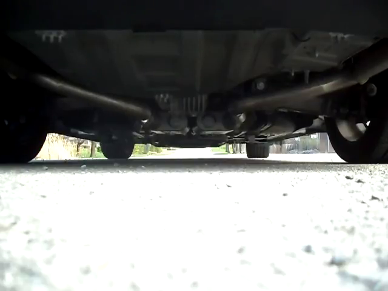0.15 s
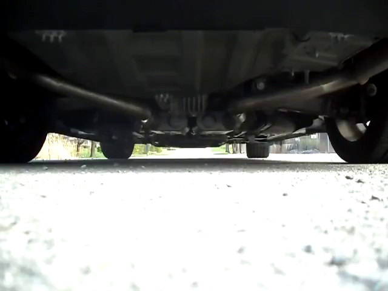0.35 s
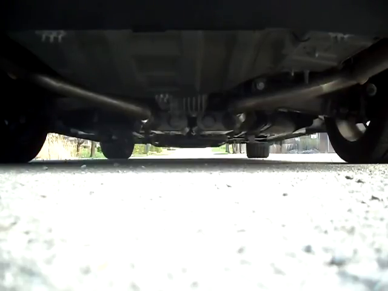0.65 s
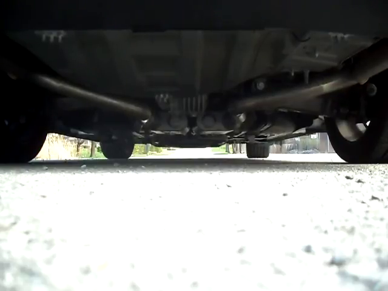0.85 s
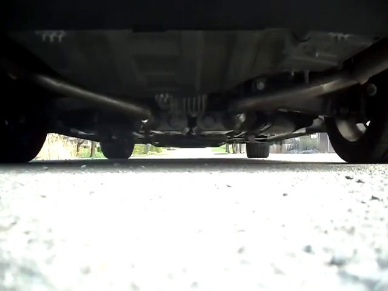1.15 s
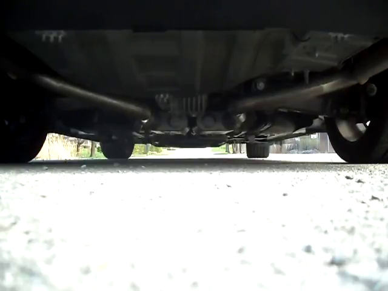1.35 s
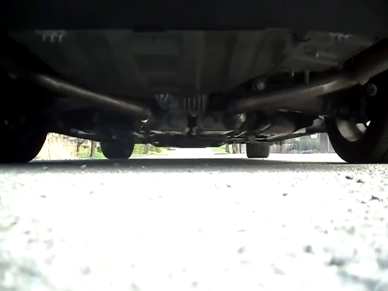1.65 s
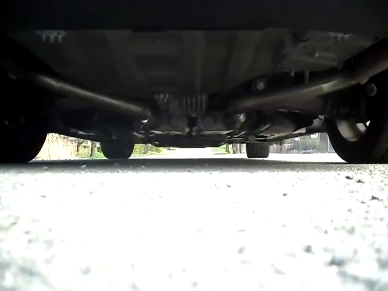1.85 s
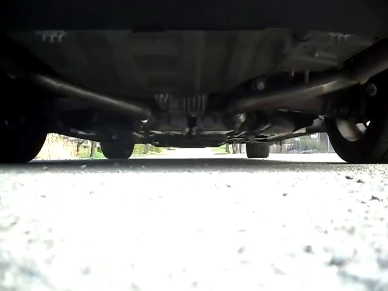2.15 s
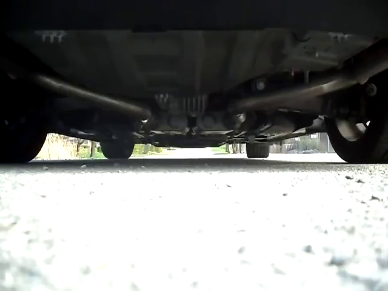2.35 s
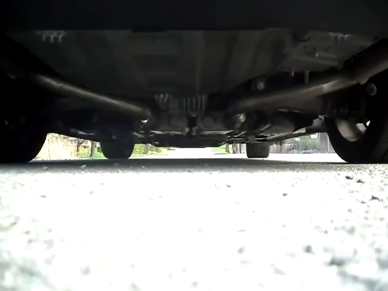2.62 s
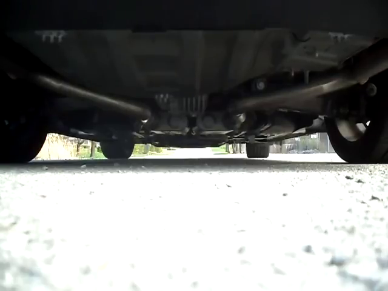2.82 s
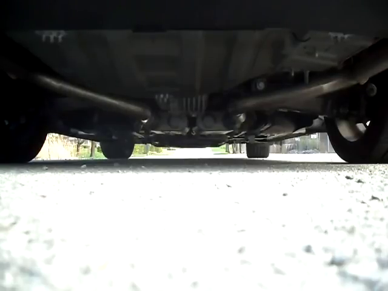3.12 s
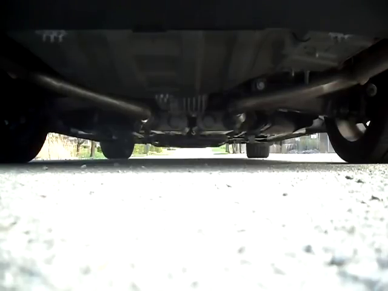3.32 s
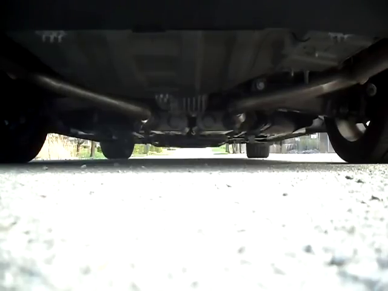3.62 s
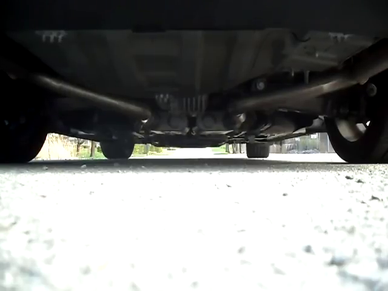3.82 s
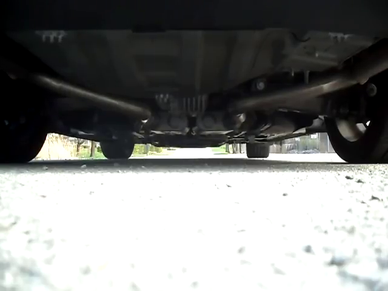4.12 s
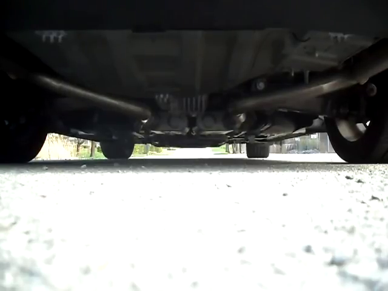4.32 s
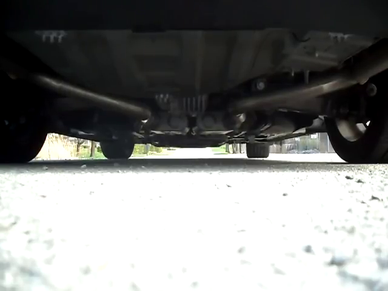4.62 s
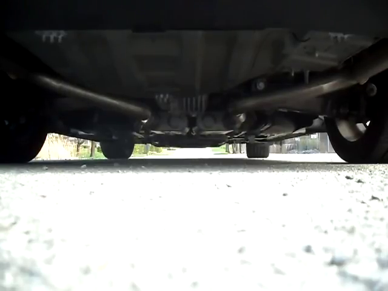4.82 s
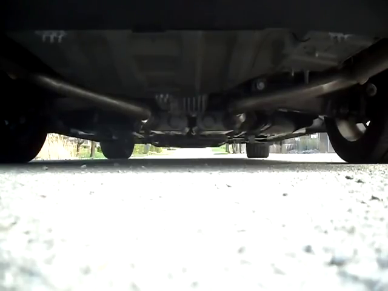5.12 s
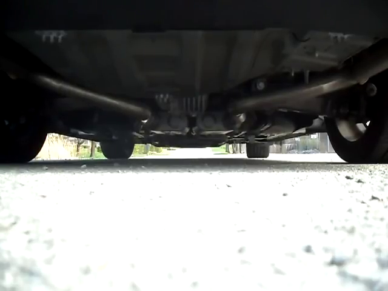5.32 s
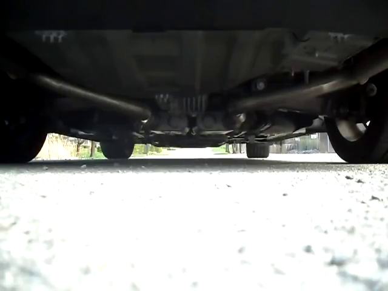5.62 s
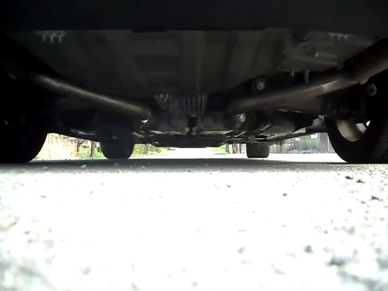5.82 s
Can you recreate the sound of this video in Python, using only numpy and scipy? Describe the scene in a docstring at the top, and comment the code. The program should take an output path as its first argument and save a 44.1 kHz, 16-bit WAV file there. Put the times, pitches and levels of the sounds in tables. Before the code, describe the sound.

A V8 car engine, already running near idle, burbles unevenly through its tail pipes. The throttle is blipped three times, the second highest. Each rev sweeps up with rushing gas and a metallic whir, overloading the microphone into crackle. A low chug follows the second rev. After the third, the engine sinks to a loping idle with dull thuds and faint ticks of hot pipes. The microphone sits close, on the ground beneath the exhaust.

```python
"""A V8 heard from the ground under its tail pipes. It starts near idle, the uneven pulses of its two
cylinder banks burbling in the pipes. The throttle is blipped three times: each time the note sweeps up
through the pipe resonances, gas rushes, the engine whirs ahead and steep pressure crests overload the
microphone and crackle. Unburnt fuel chugs after the second blip. After the third the engine sinks back
to a loping idle, with dull thuds and the ticking of hot pipes."""
import sys
import numpy as np
from scipy import signal
from scipy.fft import rfft, irfft, next_fast_len
from scipy.io import wavfile

SR = 44100
rng = np.random.default_rng(int(sys.argv[2]) if len(sys.argv) > 2 else 0)


def master_out(mix):
    """Clip the mix to full scale and print it as 16-bit PCM to the path in sys.argv[1]."""
    frames = np.transpose(np.atleast_2d(mix))
    ceiling = np.clip(frames, -1, 1)
    pcm = np.round(ceiling * 32767).astype(np.int16)
    wavfile.write(sys.argv[1], SR, pcm)


N = 262836
TIME = np.arange(N) / SR
CYLINDERS = 8
HEAT_PER_OCTAVE, HEAT_LOAD = .059, .092   # hot gas lifts resonances by a share: with revs, at full load


def from_db(db):
    """Decibels to gain."""
    return 10 ** (np.asarray(db) / 20)

def rms_one(x):
    """Scale to unit rms."""
    return x / np.sqrt(np.mean(x ** 2) + 1e-20)

def curves(rows, at):
    """Look up `at` in a table's first column: one curve for each other column."""
    points, *columns = np.transpose(rows)
    return [np.interp(at, points, column) for column in columns]

def butter(x, hz, kind, order=2):
    """Causal Butterworth filter."""
    return signal.sosfilt(signal.butter(order, hz, kind, fs=SR, output="sos"), x)

def filtered(x, response):
    """Pass x through a frequency response given as a function of Hz."""
    size = next_fast_len(N + SR // 2)
    hz = np.maximum(np.arange(size // 2 + 1) * SR / size, 1)
    return irfft(rfft(x, size) * response(hz), size)[:N]

def coloured_noise(colour):
    """Noise of unit rms shaped by an EQ curve."""
    at, db = np.transpose(colour)
    white = rng.standard_normal(N)
    return rms_one(filtered(white, lambda hz: from_db(np.interp(np.log(hz), np.log(at), db))))

def wall_ring(hz, width_hz, db):
    """Noise rings one metallic resonance of the pipe wall."""
    resonance = signal.iirpeak(hz, hz / width_hz, fs=SR)
    return from_db(db) * rms_one(signal.lfilter(*resonance, rng.standard_normal(N)))

def pops(rows, band_hz, trim_db=0):
    """Single spikes heard through a band, from rows of (start_s, level_db)."""
    spikes = np.zeros(N)
    for start_s, db in rows:
        spikes[int(start_s * SR)] = from_db(db + trim_db)
    height = np.abs(butter(signal.unit_impulse(64), band_hz, "band", order=1)).max()
    return butter(spikes + 1e-18, band_hz, "band", order=1) / height


# Ticks of the hot pipes: start_s, relative_db
PIPE_TICKS = [(0.981, -40), (1.1857, -40), (2.8034, -40), (4.4047, -36), (4.468, -33), (4.708, -35),
              (4.916, -31), (5.2646, -37)]
def pipe_ticks(decay_s=.0014, trim_db=-9):
    """Short dry snaps of expanding metal."""
    envelope = np.zeros(N)
    for start_s, db in PIPE_TICKS:
        envelope += from_db(db + trim_db) * np.exp(-np.abs(TIME - start_s) / decay_s) * (TIME >= start_s)
    return butter(envelope * rng.standard_normal(N), [3000, 9500], "band")

# Airy noise beds, throttle shut: firing_hz, whir_db, rush_db
AIR_BEDS = [(102, -54, -71), (137, -54, -64.5), (196, -49.5, -67.5), (260, -45.5, -65), (295, -39.5, -61.5),
            (347, -39.5, -51)]
# Rough noise beds, throttle shut: firing_hz, turbulence_db (relative to the exhaust), gust_db
ROUGH_BEDS = [(102, -10.5, -35), (125, -14, -52), (190, -13.5, -58), (240, -14, -60), (290, -21, -62),
              (350, -14, -50)]
def coasting_levels(firing_hz):
    """Off the throttle, the four noise layers follow the revs."""
    return curves(AIR_BEDS, firing_hz) + curves(ROUGH_BEDS, firing_hz)

def gusts(coasting_db, octaves, load, afterburn, open_db=-33.5, octave_db=9.5, afterburn_db=-21):
    """Exhaust gas buffets the microphone with a low rumble."""
    blast = from_db(open_db + octave_db * octaves) * load
    level = from_db(coasting_db) + blast + from_db(afterburn_db) * afterburn
    return level * rms_one(butter(rng.standard_normal(N), [22, 75], "band"))

# Colour of the gas rush: frequency_hz, gain_db
RUSH_COLOUR = [(1500, -14), (2000, 5.5), (3000, -9), (4000, 0.5), (4800, -4.5), (5500, 1.5), (6400, 0.5),
               (7200, -4), (8500, -7.5), (10200, -9.5), (11000, -24.5), (15500, -38)]
# Rush of each blip, wide open at mid revs: level_db
BLIP_RUSH_DB = [-47.5, -43.5, -47]
def gas_rush(coasting_db, octaves, blip_loads, flow, octave_db=17, load_power=4.1, throb=.77):
    """Escaping gas hisses, throbs with the puffs and swells steeply with revs and load."""
    surge = from_db(BLIP_RUSH_DB) @ blip_loads ** load_power
    level = from_db(coasting_db) + from_db(octave_db * octaves) * surge
    hiss = coloured_noise(RUSH_COLOUR) * (1 + throb * (flow - 1))
    return level * (hiss + wall_ring(hz=2060, width_hz=45, db=-2))

def pipe_ring(heat, cool_hz=1750, width_hz=70, db=-8.5):
    """A high standing wave: a thin metallic ring whose pitch sinks as the gas cools."""
    waver = butter(rng.standard_normal(N) + 1j * rng.standard_normal(N), width_hz / 2, "low")
    phase = 2 * np.pi * np.cumsum(cool_hz * (1 + heat)) / SR
    return from_db(db) * rms_one(np.real(waver * np.exp(1j * phase)))

# Colour of the engine whir: frequency_hz, gain_db
WHIR_COLOUR = [(300, -14), (700, 2.5), (950, 3.5), (1150, 4), (1400, -0.5), (1750, -4), (2000, -12.5),
               (2250, -4.5), (2700, -11), (3400, -12), (3900, -12.5), (4700, -18), (8000, -26),
               (15000, -67)]
def engine_whir(coasting_db, load, heat, flow, load_db=9, throb=.26):
    """The engine whirs ahead with a metallic edge, throbbing with the puffs."""
    whir = coloured_noise(WHIR_COLOUR) + wall_ring(hz=1790, width_hz=260, db=-8.5) + pipe_ring(heat)
    return from_db(coasting_db + load_db * load) * whir * (1 + throb * (flow - 1))

# Dull accents at low revs: start_s, level_db
THUDS = [(.287, -13), (4.835, -19), (4.893, -20), (4.993, -18), (5.057, -17), (5.115, -13), (5.178, -23),
         (5.231, -19)]
def firing_thuds():
    """Single strong firings stand out as thuds."""
    return butter(pops(THUDS, [250, 700]), 1100, "low", order=3)

# Runs of microphone crackle at high revs: start_s, end_s, place_in_cycle (0-1), relative_db
CRACKLE_RUNS = [(.42, .55, .32, -20), (.44, .5, .83, -19), (1.52, 1.545, .72, -15), (1.54, 1.565, .23, -9),
                (1.84, 2.29, .68, -21), (2.43, 2.545, .53, -23), (2.53, 2.62, .8, -21),
                (3.23, 3.26, .28, -17), (3.41, 3.565, .8, -19), (3.76, 3.9, .66, -19.5)]
def overload_crackle(cycle, scatter_db=1.5):
    """The strongest exhaust pulse overloads the microphone and crackles once every cycle."""
    clicks = []
    for start_s, end_s, place, db in CRACKLE_RUNS:
        times = np.interp(np.arange(int(cycle[-1])) + place, cycle, TIME)
        levels = db + scatter_db * rng.standard_normal(len(times))
        clicks += [(s, level) for s, level in zip(times, levels) if start_s <= s <= end_s]
    return butter(pops(clicks, [1200, 2800], trim_db=-1), 6000, "low", order=1)

# Punch of each cylinder, in firing order: relative_db
CYLINDER_DB = [-6, -0.5, 1.92, 1.5, 0, -3, -2, 2.5]
def valve_puffs(cycle, scatter_db=2.5, fall=1.67):
    """Gas flow: each exhaust valve opens with a puff of its own strength that then dies away."""
    stroke, within = np.divmod(cycle * CYLINDERS, 1)
    stroke = stroke.astype(int)
    puff_db = scatter_db * rng.standard_normal(4096)[stroke] + np.array(CYLINDER_DB)[stroke % CYLINDERS]
    return rms_one(from_db(puff_db) * np.exp(-fall * within))

# Body of the exhaust pipe, before heat shifts it: pitch_hz, width_hz, gain_db
PIPE_MODES = [(45.8, 13, -23.5), (127.1, 12, -9.5), (234.86, 17.8, -4), (357, 26.8, -4.5),
              (478.2, 12.45, 1), (600.2, 31.4, -1.5), (709.3, 28, -5.5), (825, 167, -10.5)]
def pipe(hz):
    """Response of the exhaust pipe; neighbouring standing waves have opposite signs at its mouth."""
    return sum((-1) ** i * from_db(db) / (1 + 1j * (hz ** 2 - centre ** 2) / (hz * width))
               for i, (centre, width, db) in enumerate(PIPE_MODES))

def turbulence(coasting_db, load, flow, load_db=11.5):
    """Ragged puffs ring the pipe between the harmonics; load crossfades from a cool pipe to a hot one."""
    eddies = butter(flow * rng.standard_normal(N), 400, "low", order=1)
    eddies = butter(eddies, 90, "high")
    heat = HEAT_LOAD + HEAT_PER_OCTAVE / 2
    cool = rms_one(filtered(butter(eddies, 1300, "low"), pipe))
    hot = rms_one(filtered(eddies, lambda hz: pipe(hz / (1 + heat))))
    return from_db(coasting_db + load_db * load) * (np.sqrt(1 - load) * cool + np.sqrt(load) * hot)

# Throttle blips: start_s, rise_s, release_s, push_hz_per_s (of firing rate)
BLIPS = [(.2172, .1194, .5409, 610), (1.3254, .2052, 1.7332, 672), (3.0448, .2118, 3.3344, 727.4)]
def throttles(lags_s=(0, 0, 0), shut_s=.0402):
    """Opening of the throttle in each blip, 0-1: pressed evenly, held, let go."""
    openings = []
    for (start_s, rise_s, release_s, _), lag_s in zip(BLIPS, lags_s):
        press = np.clip((TIME - lag_s - start_s) / rise_s, 0, 1)
        let_go = np.exp(-np.maximum(TIME - lag_s - release_s, 0) / shut_s)
        openings.append(press * let_go)
    return np.array(openings)

def engine_speed(start_hz=123.2, idle_hz=102, grip_hz=4, drag_per_s=.3128, friction_hz_per_s=39.65):
    """Firing rate: blips spin the flywheel up, drag and friction slow it, the idle control catches it."""
    push = np.array(BLIPS)[:, 3] @ throttles() - friction_hz_per_s
    free_hz = signal.lfilter([1 / SR], [1, -np.exp(-drag_per_s / SR)], push, zi=[start_hz])[0]
    return idle_hz + grip_hz * np.logaddexp(0, (free_hz - idle_hz) / grip_hz)

# Fader ride of the exhaust, before revs and load: time_s, level_db
EXHAUST_FADER = [(0, -22), (.22, -23), (.29, -13), (.345, -22), (.5, -16.5), (.6, -24), (.95, -18.5),
                 (1.35, -19), (1.65, -16.5), (1.79, -15.5), (2.1, -15), (2.9, -20), (3.4, -16.5),
                 (4.1, -20.5), (4.55, -18.5), (5.2, -19), (5.42, -26), (5.96, -23)]
# Brightness ride of the note, before revs and load: time_s, tilt_db_per_octave
EXHAUST_TILT = [(0, 5), (.4, -4), (.6, -4.5), (1.1, -3), (1.35, -3), (1.6, -3), (1.9, -1.5), (2.15, -2),
                (2.35, -3.5), (2.55, -1.5), (2.85, -3), (3.5, -3), (3.9, -1.5), (4.2, -4), (4.5, -2),
                (5.1, -1), (5.4, -2), (5.96, -2)]
def exhaust_voicing(octaves, load):
    """Level and tilt: revs make the note louder and brighter, load louder and darker."""
    level_db = curves(EXHAUST_FADER, TIME)[0] + 2 * octaves + 2.5 * load
    tilt_db = curves(EXHAUST_TILT, TIME)[0] + 1.6 * octaves - load
    return level_db, tilt_db

def drone_db(hz, firing_hz, peak_db=4, centre_hz=388, width_hz=42):
    """At high revs one band of the exhaust builds up into a drone."""
    return peak_db * np.interp(firing_hz, [250, 320], [0, 1]) * np.exp(-((hz - centre_hz) / width_hz) ** 2)

# Harmonics of the four-stroke cycle: multiple, throttle_shut_db, full_load_db
HARMONICS = [(1, 5.5, 15), (2, 6, 8), (3, 5, -4), (4, 7, 6.5), (5, 9, 4.5), (6, 8, 7), (7, 8, 3),
             (8, 10.5, 14.5), (9, 4, 1.5), (10, 6, 7.5), (11, 6.5, 2.5), (12, -7.5, -4.5), (13, 0.5, -11),
             (14, -5, 2.5), (15, 0.5, 0.5), (16, 3, 2.5), (17, -2.5, 1), (18, -2.5, 7), (19, -5.5, 4),
             (20, -6.5, -5), (21, -9.5, 2), (22, -20.5, -2), (23, -7, -9), (24, -12.5, 1.5),
             (25, -9.5, 3.5), (26, -9, -0.5), (27, -13.5, -13.5), (28, -10, 5)]
def exhaust_note(cycle, controls, bank_lead=.176, even_db=9.5, chug_db=18, step=64):
    """Harmonics of the two banks' uneven pulses slide through the pipe resonances."""
    firing_hz, load, level_db, tilt_db, afterburn, heat = [curve[::step] for curve in controls]
    bank = np.array([0, 1, 1, 0, 1, 0, 0, 1])   # in firing order; bank 1 arrives early
    arrival = (np.arange(CYLINDERS) - bank_lead * bank) / CYLINDERS
    evenness = np.exp(-((firing_hz - 127.7) / 54) ** 2)
    note = np.zeros(N)
    for k, shut_db, open_db in HARMONICS:
        hz = k * firing_hz / CYLINDERS
        db = level_db + shut_db * (1 - load) + open_db * load + tilt_db * np.log2(hz / 250)
        # just above idle the cylinders even out: more firing tone, less low burble
        db += even_db * evenness * ((k == CYLINDERS) - (k < CYLINDERS - 2))
        # unburnt fuel chugs in the lowest harmonics
        db += chug_db * afterburn * np.exp(-((k - 1) / 2.2) ** 2)
        gain = from_db(db + drone_db(hz, firing_hz)) * pipe(hz / (1 + heat))
        pulses = np.sum(from_db(CYLINDER_DB) * np.exp(-2j * np.pi * k * arrival))
        phase = 2 * np.pi * k * cycle + np.angle(pulses)
        note += np.real(np.interp(TIME, TIME[::step], gain) * np.exp(1j * phase))
    return note

def sharpened(wave, steepen=.79, above_hz=620):
    """Strong waves grow sharp crests, which adds overtones above the main harmonics."""
    return wave + steepen * filtered(wave ** 2, lambda hz: 1 / (1 + (above_hz / hz) ** 6))


def scene(mid_revs_hz=200):
    """Speed and load drive the exhaust, whir, gas rush and gusts; crackle, thuds and ticks go on top."""
    firing_hz = engine_speed()
    octaves = np.log2(firing_hz / mid_revs_hz)
    blip_loads = throttles(lags_s=(.024, .032, .04))   # the exhaust feels each blip a little late
    load = np.clip(blip_loads.sum(axis=0), 0, 1)
    heat = HEAT_PER_OCTAVE * octaves + HEAT_LOAD * load
    afterburn = np.interp(TIME, [1.78, 1.856, 2.136], [0, 1, 0])   # after the highest blip
    cycle = np.cumsum(firing_hz) / CYLINDERS / SR - .3205
    flow = valve_puffs(cycle)
    whir_db, rush_db, turbulence_db, gust_db = coasting_levels(firing_hz)
    level_db, tilt_db = exhaust_voicing(octaves, load)
    note = exhaust_note(cycle, (firing_hz, load, level_db, tilt_db, afterburn, heat))
    exhaust = sharpened(note + turbulence(level_db + turbulence_db, load, flow))
    whir = engine_whir(whir_db, load, heat, flow)
    rush = gas_rush(rush_db, octaves, blip_loads, flow)
    rumble = gusts(gust_db, octaves, load, afterburn)
    return (exhaust + overload_crackle(cycle) + firing_thuds() + whir + rush + rumble + pipe_ticks())[None]

def record(dry, ceiling=.68, dull_hz=10800, cutoff_hz=15800):
    """The overloaded microphone cuts the crests flat; the treble is dulled and then cut."""
    dulled = butter(np.clip(dry, -ceiling, ceiling), dull_hz, "low", order=3)
    return signal.sosfilt(signal.ellip(8, .1, 70, cutoff_hz, fs=SR, output="sos"), dulled)


dry = scene()
out = record(dry)
master_out(out)
```